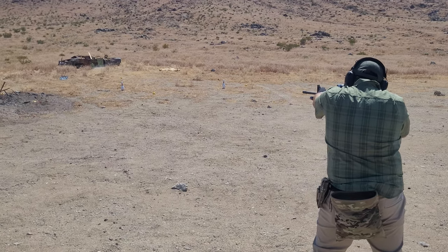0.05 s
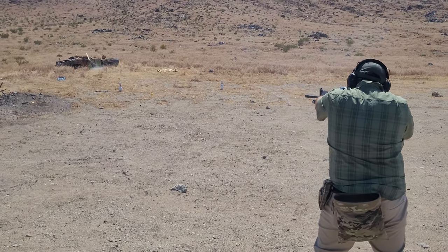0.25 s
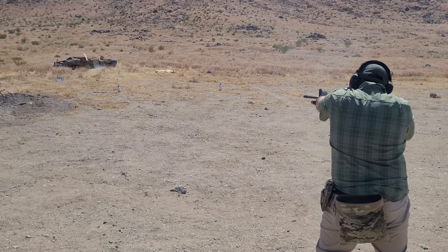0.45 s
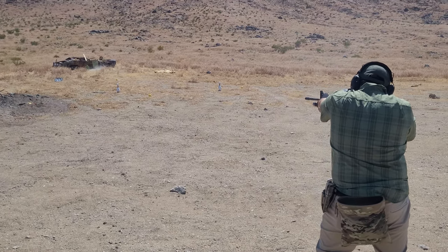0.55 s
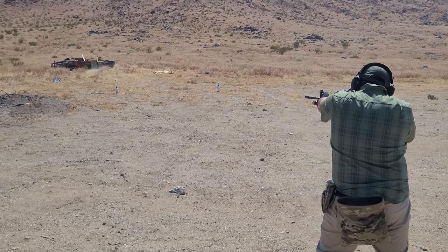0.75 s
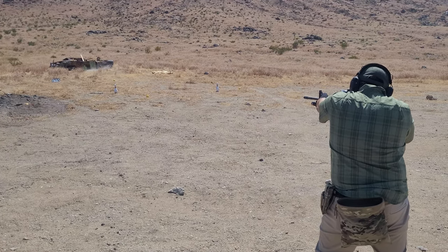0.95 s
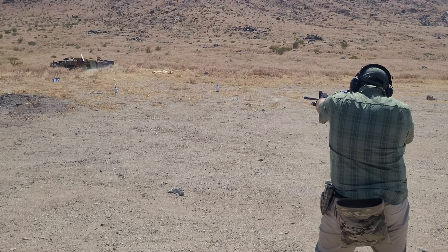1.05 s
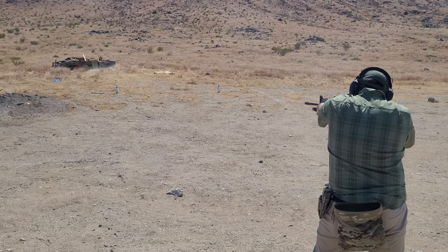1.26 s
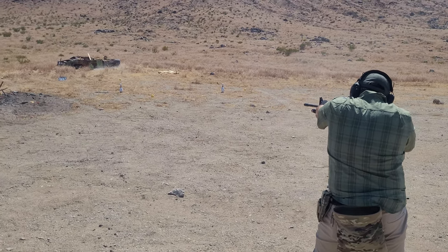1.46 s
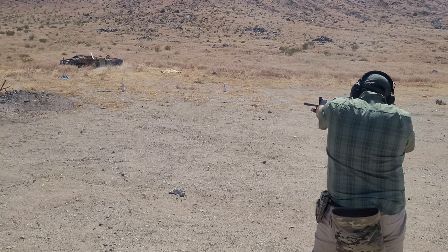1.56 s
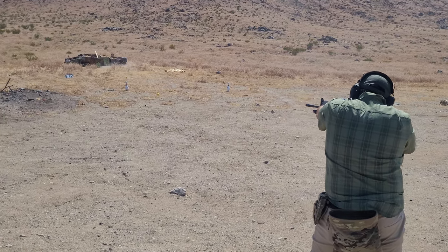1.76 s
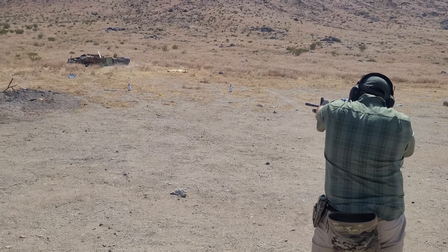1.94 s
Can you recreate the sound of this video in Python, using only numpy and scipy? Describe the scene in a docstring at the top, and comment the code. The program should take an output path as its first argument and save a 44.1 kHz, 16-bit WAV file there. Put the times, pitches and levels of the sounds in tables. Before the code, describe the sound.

A rifle fires twice, then three quick times, echoing off desert hills.

```python
"""Five rifle shots over open desert, just ahead of a stereo microphone, above a faint rumble.
The first blast (0.22 s) brings ground bounces, echoes off the slope and a roll off the hills; its
bullet rings a far steel plate (0.35 s). The ring drops away under the second blast (0.48 s) and is gone
by 0.8 s, as spent cases start to tinkle. Three quick shots follow (1.22-1.66 s), their bullets thudding
down; the brighter left microphone port turns hissy and drops out briefly under the last two blasts."""
import sys
import numpy as np
from scipy.fft import rfft, irfft, next_fast_len
from scipy.io import wavfile
from scipy.ndimage import map_coordinates

SR = 44100
rng = np.random.default_rng(int(sys.argv[2]) if len(sys.argv) > 2 else 0)


def wrap_up_sound(samples):
    """Save the sound to the file named by the first command line argument, as 16-bit audio."""
    columns = np.atleast_2d(samples).T
    # keep every value between -1 and 1, then stretch to whole-number steps
    tamed = np.clip(columns, -1, 1)
    steps = np.round(tamed * 32767).astype(np.int16)
    wavfile.write(sys.argv[1], SR, steps)


N = 88200
T = np.arange(N) / SR


def amp(db):
    return 10 ** (np.asarray(db) / 20)


def pan(right_db):
    return amp([[0], [right_db]])


def delayed(x, delay_s):
    return np.pad(np.atleast_2d(x), ((0, 0), (round(delay_s * SR), 0)))[:, :N]


def filtered(x, response):
    size = next_fast_len(N + 8192)
    return irfft(rfft(x, size) * response(np.fft.rfftfreq(size, 1 / SR)), size)[..., :N]


def lowpass(x, cutoff_hz, order=4):
    return filtered(x, lambda hz: 1 / (1 + (hz / cutoff_hz) ** order))


def wobble(knots_per_s):
    """Smooth random curve."""
    return map_coordinates(rng.standard_normal(int(N * knots_per_s / SR) + 4), [T * knots_per_s])


def noise(spectrum, correlation):
    """Shaped stereo noise, rms 1."""
    f_hz, level_db = np.transpose(spectrum)
    shape = lambda hz: amp(np.interp(np.log(hz + 1), np.log(f_hz + 1), level_db))
    mid, side = filtered(rng.standard_normal((2, N)), shape)
    angle = np.arccos(np.clip(correlation, 0, 1)) / 2
    x = np.cos(angle) * mid + np.sin(angle) * np.array([side, -side])
    return x / x.std()


def pulse(start_s, width_ms):
    """Push of air, then a longer suction."""
    u = np.clip((T - start_s) * 1000 / width_ms, 0, 60)
    return u * u * (3 - u) * np.exp(-u) / .78


def decay(start_s, db, t60_s, rise_s):
    age_s = np.maximum(T - start_s, 0)
    return amp(db - 60 * age_s / t60_s) * (1 - np.exp(-age_s / rise_s))


def tone(start_s, hz, db, t60_s, rise_s, phase=0):
    return decay(start_s, db, t60_s, rise_s) * np.sin(2 * np.pi * hz * (T - start_s) + phase)


def ring(start_s, db, modes, waver_db=3.5):
    """Struck metal, one row per mode; unsteady above 2 kHz."""
    rows = []
    for hz, mode_db, t60_s in modes:
        waver = amp(waver_db * wobble(hz ** .5) * (hz > 2000))
        rows.append(waver * tone(start_s, hz, db + mode_db, t60_s, .0022, rng.uniform(0, 6)))
    return np.array(rows)


# Rumble spectrum: f/Hz, level/dB
RUMBLE_SPECTRUM = [(15, -45), (25, -15.5), (41, -3), (59, -3), (78, -8), (87, -22), (97, -31.5), (153, -38),
                   (256, -37.5), (575, -65), (16000, -65.5)]
def rumble(level_db=-65, swing_db=3.5):
    """Faint, wavering low noise."""
    return amp(level_db + swing_db * wobble(4.7)) * noise(RUMBLE_SPECTRUM, .6)


# Case landings: t/s, level/dB
CASES = [(.770, -91), (0.939, -74.5), (1.201, -92), (1.92, -57)]
# Case modes: f/Hz, level/dB, t60/s
BRASS_MODES = [(10650, -6, .3), (14700, 0, .2), (14950, -12, .15)]
def cases():
    """Brass rings and ticks on stones to the left."""
    tick = lambda s, db: decay(s, db + 1, .012, .0003) * noise(HISS_LEFT_SPECTRUM, 0)[0]
    return sum(ring(s, db, BRASS_MODES).sum(0) + tick(s, db) for s, db in CASES) * pan(-30)


# Roll spectrum: f/Hz, level/dB
ROLL_SPECTRUM = [(53, -35), (90, -4), (141, -13.5), (235, -3), (343, -13.5), (401, -41), (429, -23.5),
                 (700, -40.5), (910, -69), (1540, -120)]
def hill_roll(level_db=-41.5, floor_db=-78.5, t60_s=1.2):
    """Each shot rolls back off distant hills."""
    power = amp(floor_db) ** 2 + sum(decay(s, level_db, t60_s, .05) ** 2 for s, *_ in SHOTS)
    return np.sqrt(power) * amp(2.5 * wobble(17)) * noise(ROLL_SPECTRUM, .6) * pan(-3)


# Plate modes: f/Hz, level/dB, t60/s
STEEL_MODES = [(705, 0, 2.7), (1642, -18, 0.5), (3063, -34, 0.34), (4893, -33, 1.6), (6191, -37, 0.13),
               (7445, -56, 5.0), (9308, -43, 5.0), (9717, -31, 0.41), (10350, -26, 0.2), (11820, -27, 0.15),
               (12580, -27, 0.31), (13600, -20, 0.099), (14410, -30, 0.25), (15270, -22, 0.1)]
# Ring fade: t/s, level/dB
STEEL_FADE = [(.475, 0), (.485, -8), (.72, -13), (.8, -50)]
def steel_plate(level_db=-46.5, right_cutoff_hz=2500):
    """The first bullet rings a plate; high modes lie to the left."""
    fade = amp(np.interp(T, *np.transpose(STEEL_FADE)))
    modes = ring(IMPACTS[0][0] + .004, level_db, STEEL_MODES) * fade
    right_gains = 1 / (1 + (np.array(STEEL_MODES)[:, 0] / right_cutoff_hz) ** 2)
    return np.array([modes.sum(0), right_gains @ modes])


# Bullet landings: t/s, thud/dB, crackle/dB, hiss/dB, boom/dB, t60/s
IMPACTS = [(0.3519, -10, -36, -38.5, -30, 0.048), (0.619, -29.5, -41.5, -55.5, -43, 0.073),
           (1.3620, -26, -55.5, -63, -40, 0.18), (1.6, -26, -40, -44, -25.5, 0.1),
           (1.804, -37, -41, -46, -24.5, 0.081)]
# Landing boom spectrum: f/Hz, level/dB
IMPACT_SPECTRUM = [(88, -33), (150, -2), (286, 5.5), (416, -5.5), (567, 1.5), (892, -28.5), (1500, -28),
                   (1950, -47), (3300, -120)]
def impacts(width_ms=.45, gap_s=.0023):
    """Each bullet lands with a double thud, a clack and a scattered boom."""
    left = right = boom = 0
    for s, db, _, _, boom_db, t60_s in IMPACTS:
        thud = -pulse(s + gap_s, width_ms) + .38 * pulse(s + 2 * gap_s, width_ms)
        clack = tone(s + gap_s, hz=645, db=-1.5, t60_s=.022, rise_s=.00051)
        left += amp(db) * (thud - clack)
        right += amp(db - 6) * pulse(s + .0016, width_ms)
        boom += decay(s, boom_db, t60_s, .0032)
    right += amp(-5) * delayed(left, .0005)[0]
    return np.array([left, right]) + boom * noise(IMPACT_SPECTRUM, .6) * pan(-2.5)


# Scatter bands: onset/dB, t60/s, tail/dB, tail t60/s, right/dB, correlation (clipped to 0-1)
CRACKLE_BAND = (-22, 0.0254, -42.5, 0.2986, -18, 2.4)
HISS_BAND = (-33, 0.1834, -53.5, 0.4581, -23, -0.46)
# Band spectra: f/Hz, level/dB
CRACKLE_SPECTRUM = [(650, -34.5), (1100, 1), (1480, -7.5), (1880, -5.5), (2250, -4), (4450, -7.5),
                    (7500, -19), (9750, -43), (16500, -120)]
HISS_LEFT_SPECTRUM = [(3820, -46), (6500, -27.5), (7990, -15.5), (9600, -7.5), (13800, 2), (15900, -4.5),
                      (16200, -15.5), (16500, -35.5)]
HISS_RIGHT_SPECTRUM = [(6500, -27), (8000, -30.5), (11000, -30), (12000, -7), (14500, -2), (15800, -6.5),
                       (16500, -41.5)]
# Left port colour: t/s, crackle/dB, hiss/dB, share of bass lost
LEFT_PORT = [(0.222, 2, -0.5, 0.52), (.27, -3.2, -7, 0.48), (.45, 3, 8, 0), (0.484, -2.5, 0.5, 0.24),
             (.53, -1.1, -6.2, 0.15), (0.598, -9.5, -1.2, 0), (.75, 17, 18, 0.41), (1.226, -0.5, 2.5, 0.15),
             (1.245, 1, -4.8, 0.12), (1.274, -6, -10.5, 0.46), (1.284, 4, 9, 0.57), (1.36, 6, 24, 0.92),
             (1.455, 9, 11.5, 1), (1.465, 13, 19, 1), (1.53, 7.5, 19.5, 0.7), (1.598, 9, 22, .9),
             (1.701, 12.5, 17.5, 0.86), (1.799, 7.5, 22.5, 0.88), (2, 23.5, 10, 0.86)]
def treble_scatter(band, left_spectrum, right_spectrum, column):
    """Fluttering noise after impacts, blasts and echoes; column 1 is crackle, 2 is hiss."""
    onset_db, t60_s, tail_db, tail_t60_s, right_db, correlation = band
    power = sum(decay(hit[0], hit[1 + column], hit[-1], .0032) ** 2 for hit in IMPACTS)
    for s, db, *_ in SHOTS:
        power += decay(s, db + onset_db, t60_s, .0006) ** 2
        power += decay(s, db + tail_db, tail_t60_s, .002) ** 2
        power += sum(decay(s + echo[0], db + echo[1 + column], .035, .0014) ** 2 for echo in ECHOES)
    port = np.transpose(LEFT_PORT)
    gains = amp([np.interp(T, port[0], port[column]), np.full(N, right_db)])
    pair = np.array([noise(left_spectrum, correlation)[0], noise(right_spectrum, correlation)[1]])
    flutter_db = 2 * wobble(250) + .5 * wobble(60)
    return np.sqrt(power) * pair * gains * amp(flutter_db)


# Boom band: onset/dB, t60/s, tail/dB, tail t60/s, right/dB, correlation
BOOM_BAND = (-15, 0.2148, -28.5, 0.55, -6.5, 0)
# Boom spectrum: f/Hz, level/dB
BOOM_SPECTRUM = [(35, -48), (60, -23), (174, -11), (231, -15.5), (268, 0.5), (417, -8.5), (440, -12),
                 (642, -14), (755, -19.5), (1500, -35), (1950, -65.5), (3300, -120)]
def scattered_boom():
    """Low scatter of one blast: fast decay, longer tail."""
    onset_db, t60_s, tail_db, tail_t60_s, right_db, correlation = BOOM_BAND
    envelope = np.hypot(decay(.0048, onset_db, t60_s, .002), decay(.004, tail_db, tail_t60_s, .006))
    return envelope * noise(BOOM_SPECTRUM, correlation) * pan(right_db)


# Echoes: delay/s, blast copy/dB, crackle/dB, hiss/dB
ECHOES = [(.038, -18.5, -42, -46.5), (.047, -25, -44, -46), (.061, -19.5, -78, -68), (.082, -26, -76, -47),
          (.211, -28.5, -73, -79.5), (0.264, -28, -95, -79)]
def echoes(blast, cutoff_hz_s=87):
    """Ground and slope return the blast, duller with delay."""
    return sum(amp(db) * delayed(lowpass(blast, cutoff_hz_s / s), s) for s, db, *_ in ECHOES) * pan(-8)


# Thumps, left then right: signed gain, f/Hz, start/ms, length/ms
THUMPS = [(-.14, 66, 3, 28), (0.171, 61, 3.2, 33)]
def thump(start_s):
    """Short low swing of pressure under a blast."""
    rows = []
    for gain, hz, start_ms, length_ms in THUMPS:
        age_ms = (T - start_s) * 1000 - start_ms
        window = np.sin(np.pi * np.clip(age_ms / length_ms, 0, 1))
        rows.append(gain * window * np.sin(2 * np.pi * hz * age_ms / 1000))
    return np.array(rows)


# Blast pulses at each port: delay/ms, signed gain, width/ms
PULSES_LEFT = [(-1.2, -.15, .4), (0, .22, .2), (1.1, .35, .25), (2.8, .75, .4), (5.6, .9, .68),
               (9.2, .4, .5), (12.6, .18, .5), (15.9, .2, .4), (18.4, .22, .6)]
PULSES_RIGHT = [(.1, .55, .25), (3.25, .8, .36), (6.1, .55, .7)]
def muzzle_blast(start_s, left_lag_s=.0011):
    """Direct crack, ground bounces, housing ring; the left port dips first, then rings near 300 Hz."""
    left, right = [sum(gain * pulse(start_s + ms / 1000, width_ms) for ms, gain, width_ms in pulses)
                   for pulses in (PULSES_LEFT, PULSES_RIGHT)]
    housing = tone(start_s, hz=630, db=-5.5, t60_s=.022, rise_s=.00015)
    return np.array([left + delayed(housing, left_lag_s)[0], right + housing])


# Shots: t/s, level/dB, left blast/dB, bark/dB, left gain glitch (from/ms, to/ms, gain/dB)
SHOTS = [(0.2192, -4, 1.5, -9.5, 1.05, 0.88, 7.5), (0.4757, -1, 4.5, -13.5, 0.26, 1, -0.5),
         (1.2224, -0.5, 2, -13.5, 3.6, 0.55, 5.5), (1.4574, 0, 6, -12, -2.1, 8.7, -19),
         (1.6587, 1.5, -8.5, -15, 0.32, 7.7, -11)]
def rifle_shots(lead_s=.002):
    """All shots share pulses and echoes; each barks, mainly in the left port."""
    blast = muzzle_blast(lead_s)
    near = blast + thump(lead_s)
    far = echoes(blast[1]) + scattered_boom()
    bark = tone(lead_s, hz=1227, db=0, t60_s=.035, rise_s=.00015) * pan(-12)
    return sum(amp(db) * delayed(near * amp([[left_db], [0]]) + far + amp(bark_db) * bark, s - lead_s)
               for s, db, left_db, bark_db, *_ in SHOTS)


def scene():
    shots = rifle_shots() + hill_roll()
    crackle = treble_scatter(CRACKLE_BAND, CRACKLE_SPECTRUM, CRACKLE_SPECTRUM, column=1)
    hiss = treble_scatter(HISS_BAND, HISS_LEFT_SPECTRUM, HISS_RIGHT_SPECTRUM, column=2)
    return shots + crackle + hiss + impacts() + steel_plate() + cases() + rumble()


def record(dry):
    """The left port loses bass and jumps or drops out at blasts; soft clip; band limit."""
    times_s, *_, bass_lost = np.transpose(LEFT_PORT)
    left = dry[0] - np.interp(T, times_s, bass_lost) * lowpass(dry[0], cutoff_hz=280)
    glitch_db = sum(np.interp((T - s) * 1000, [from_ms - .5, from_ms, to_ms, to_ms + .56], [0, db, db, 0])
                    for s, *_, from_ms, to_ms, db in SHOTS)
    x = np.array([left * amp(glitch_db), dry[1]])
    ceiling, knee = 1.03, 6
    clipped = x / (1 + np.abs(x / ceiling) ** knee) ** (1 / knee)
    return lowpass(clipped, cutoff_hz=15950, order=60)


dry = scene()
out = record(dry)
wrap_up_sound(out)
```